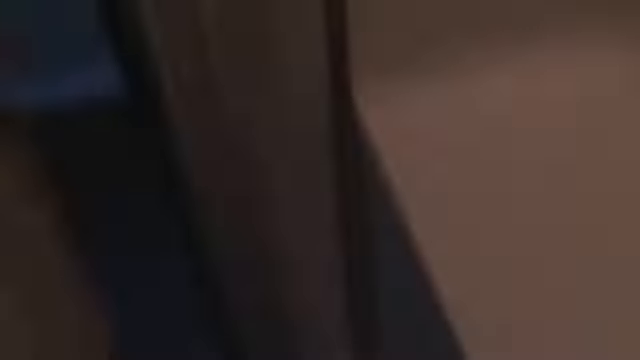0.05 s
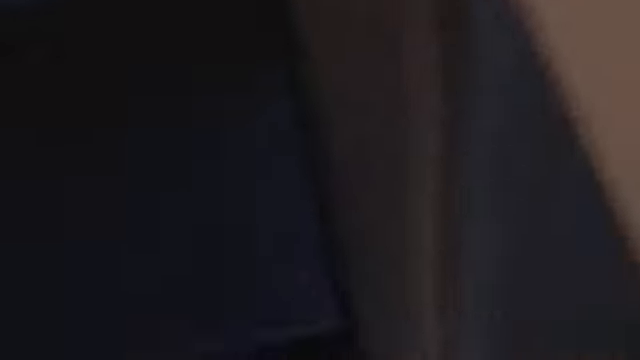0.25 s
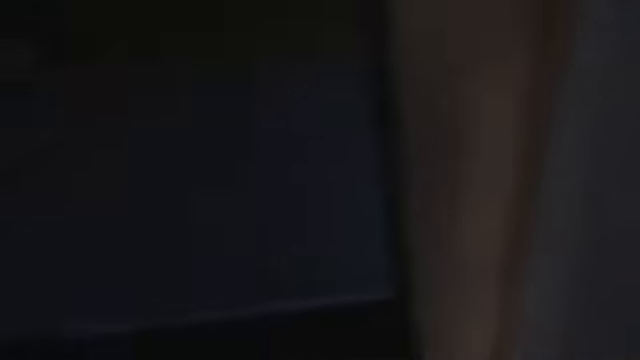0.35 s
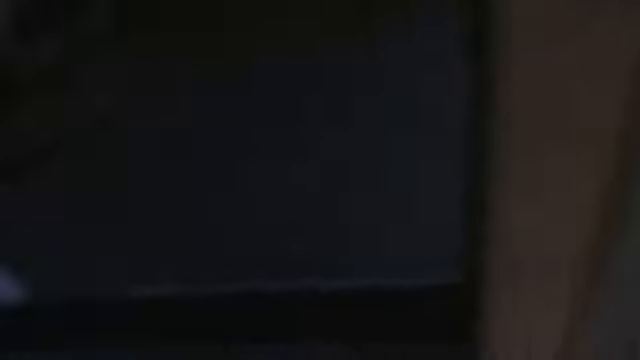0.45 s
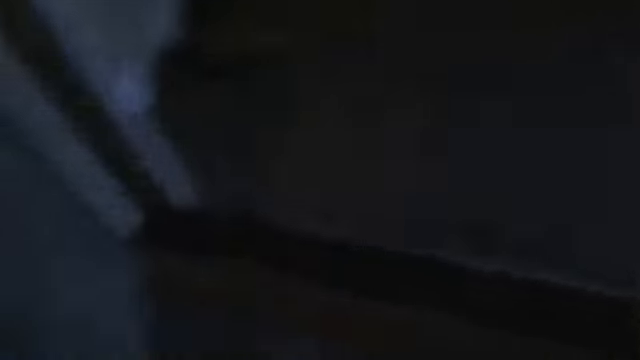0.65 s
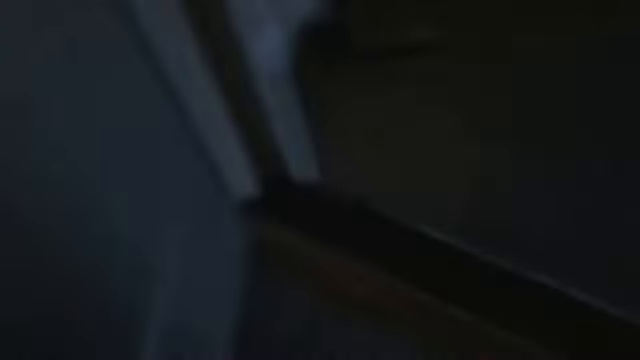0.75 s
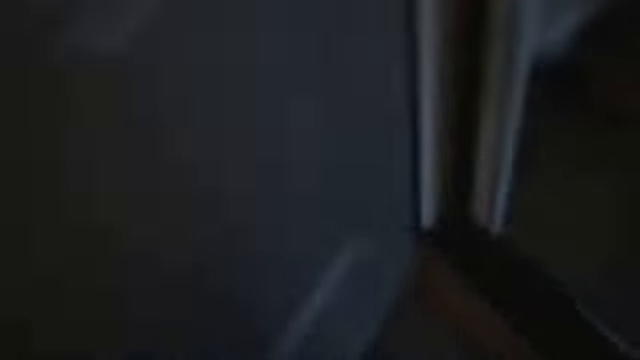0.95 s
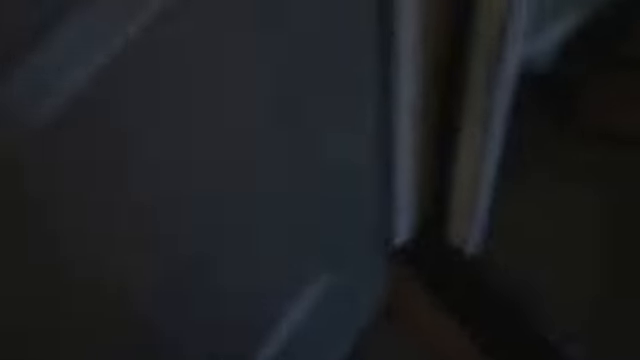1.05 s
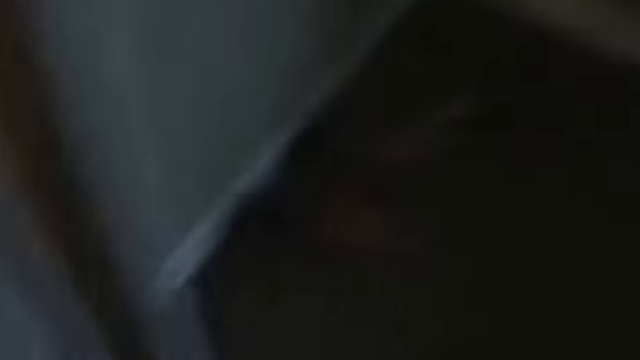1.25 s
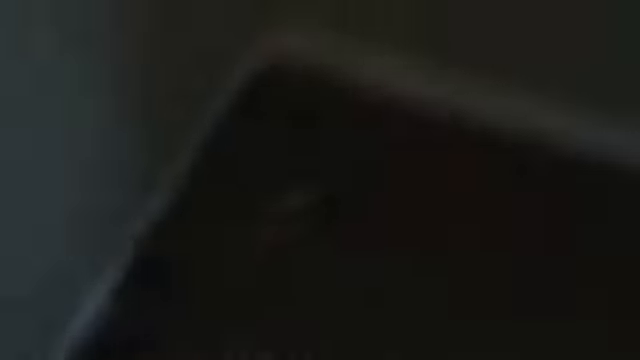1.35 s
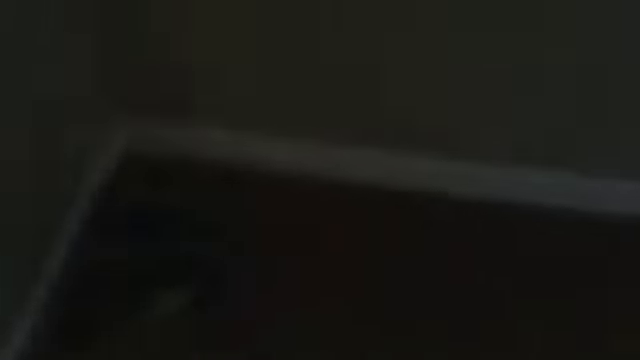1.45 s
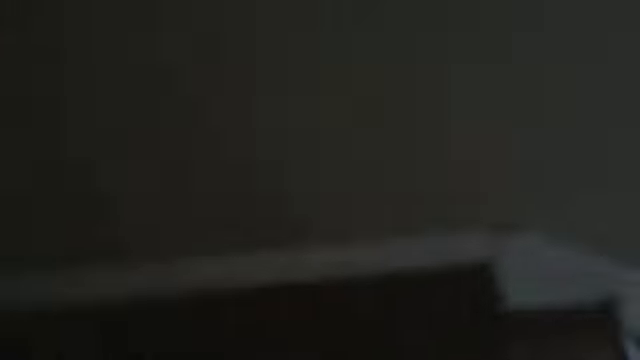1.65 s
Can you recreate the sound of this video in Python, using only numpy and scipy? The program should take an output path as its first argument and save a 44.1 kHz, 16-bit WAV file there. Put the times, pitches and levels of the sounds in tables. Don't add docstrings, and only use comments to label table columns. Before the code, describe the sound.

House door unlatches with a hard crack, then its hinge gives brief thin squeaks as it swings

```python
import sys
import numpy as np
from scipy import signal
from scipy.fft import rfft, irfft
from scipy.io import wavfile
from scipy.ndimage import uniform_filter1d

SR = 44100
rng = np.random.default_rng(int(sys.argv[2]) if len(sys.argv) > 2 else 0)


def invert_db(level):
    return 10 ** (np.asarray(level, dtype=float) / 20)


def dump_mix(stems):
    frames = np.atleast_2d(stems).T
    limited = np.clip(frames, -1, 1)
    pcm = np.round(limited * 32767).astype(np.int16)
    wavfile.write(sys.argv[1], SR, pcm)


N = 74970
T = np.arange(N) / SR

# f/Hz, density/dB
HOUSE_SPECTRUM = [(30, 4.5), (80, -4.5), (250, -8), (500, -16), (1200, -17), (2400, -14), (5000, -24),
                  (15500, -51)]
# t/s, rms level/dB, rise/s, fall t60/s, centre f/Hz
SCUFFS = [(0, -53.5, 0.0043, 0.29, 1220), (.115, -60, 0.028, .3, 1500), (.26, -48, 0.05, 0.13, 9700),
          (0.348, -46.5, 0.032, 0.12, 310), (0.923, -53, 0.005, 0.14, 1420), (0.76, -68, 0.019, 0.12, 2100),
          (1.463, -45, 0.0071, 0.16, 1660), (1.488, -43.5, 0.0037, 0.13, 3060), (1.7, -47, .008, .15, 4200),
          (1.469, -44, 0.0022, .04, 1250), (0.43, -56.5, 0.036, 0.16, 610), (1.66, -60, .03, 0.28, 280),
          (1.485, -45, 0.025, 0.15, 700), (0.2203, -30.5, 0.0019, 0.023, 2950),
          (.231, -30.5, 0.00065, 0.094, 3600), (1.28, -51.5, 0.0094, 0.061, 11500),
          (1.437, -51, 0.0044, 0.072, 13000), (1.7, -48.5, 0.0024, 0.044, 6900),
          (1.5, -49, 0.015, 0.3, 300)]
# t/s, peak level/dB, f/Hz, length/s
GRIP_BUMPS = [(0.018, -42.5, 63.5, 0.017), (0.147, -41, 102, 0.0031), (0.197, -36, 94, 0.0056),
              (0.23, -36, 65, 0.0099), (0.305, -23, 158.6, 0.006), (0.319, -28, 71, 0.012),
              (0.383, -40, 109, 0.015), (0.434, -36, 192, 0.0093), (.435, -36, 98, 0.018),
              (0.462, -30.5, 58.7, 0.017), (0.499, -37, 95, 0.0093), (0.633, -33, 148, 0.0028),
              (0.641, -31.5, 65.4, 0.014), (.695, -34.5, 81, 0.007), (.77, -49.5, 189, 0.0096),
              (.816, -33, 172.3, 0.0076), (.818, -30, 86, 0.013), (0.844, -44, 268, 0.0018),
              (0.914, -42, 60.6, 0.051), (.955, -40.5, 153, 0.0079), (0.999, -37.5, 72.4, 0.012),
              (1.052, -37, 72, 0.023), (1.078, -44, 144, 0.0091), (1.14, -26, 93, 0.0031),
              (1.18, -38, 208, 0.0048), (1.206, -32.5, 65.5, 0.014), (1.337, -29.5, 58.4, 0.0084)]
# t/s, grip rumble level/dB, cloth rustle level/dB
MOTION = [(0, 5, 2), (.07, -19, -8), (.12, -44, -2), (.15, -6, 3.5), (.3, 11.5, 19.5), (.5, 6, 1.5),
          (.56, 2, 2), (.7, 1.5, 5), (.85, -1, 1.5), (.95, -4, 4.5), (1.1, 3, 0.5), (1.2, 3.5, 3),
          (1.28, -8, 5), (1.4, -13, 6.5), (1.5, -3, 10.5), (1.6, -8.5, 3.5), (1.7, -16, 2)]
# f/Hz, density/dB
RUSTLE_SPECTRUM = [(300, -10), (1000, 7), (3000, 6), (6000, 4), (10000, -3.5), (12500, -2), (15500, -9.5)]
# t/s, peak level/dB, length/s
TICKS = [(.158, -48, 0.0042), (0.193, -58, 0.0014), (.2407, -7, .0005), (0.554, -51.5, .003),
         (1.412, -62, .002), (1.44, -49, .002), (1.513, -52, .001), (1.522, -43, .002), (1.524, -44, .002),
         (1.566, -56, .003), (1.5845, -43, .0008), (1.598, -54, .002), (1.6, -53, 0.0022),
         (1.663, -55, .002)]
# t/s, peak level/dB
LATCH_STRIKES = [
    (0.2208, -39),
    (.2225, -41),
    (0.2379, -21.5),
    (0.2409, -14),
]
# f/Hz, level/dB, t60/s
LATCH_MODES = [(4207, 2, 0.023), (3284, -5.5, .03), (3580, -5.5, .025), (2500, -8, 0.022),
               (7230, -4, 0.013), (12100, -5, 0.013)]
# t/s, peak level/dB, rattle length/s, bottom f/Hz, top f/Hz
BLOWS = [(0.237, -9, 0.0034, 1500, 13600), (.2407, -9.5, 0.00072, 1170, 15000),
         (0.2415, -13.5, 0.0092, 490, 8100), (0.2484, -21.5, 0.0031, 497, 9000),
         (0.2531, -31, 0.002, 400, 10000), (.2575, -17.5, 0.012, 400, 3000),
         (0.268, -25, 0.006, 600, 15000), (0.277, -17.5, 0.0035, 694, 6040),
         (0.2812, -20.5, .008, 685, 5930), (0.2903, -20, 0.003, 875, 7400),
         (0.296, -20.5, 0.0051, 248, 5000), (0.304, -21.5, 0.0098, 247, 2180),
         (0.318, -30, 0.0081, 497, 2500), (0.637, -33, 0.0024, 1200, 7500), (0.642, -30, 0.015, 900, 6100),
         (0.665, -32, 0.0063, 1120, 2220)]
# f/Hz, level/dB, t60/s
PANEL_MODES = [(649, -6, 0.049), (946, -5.5, 0.03), (1351, -1.5, 0.021), (1500, -4.5, 0.023),
               (1854, -1, 0.013), (2395, 1, 0.0079), (3060, -2.5, 0.013), (3540, 0.5, 0.006),
               (4540, -1.5, 0.01), (5200, 4, 0.0032), (290, -5, 0.03), (430, -11, 0.023),
               (15000, 7, 0.0044)]
# t/s, slip rate f/Hz, level/dB, overtone strength/dB
SQUEAKS = [
    [(.559, 3270, -49, -22), (.566, 3056, -35.5, -18.5), (.58, 2996, -37, -10), (.598, 2916, -37.5, -1.5),
     (.612, 2902, -37, -10), (.628, 2829, -43, -1), (.64, 2800, -52, 3)],
    [(.64, 2810, -54, 3), (.654, 2803, -42, -4), (.668, 2802, -41, -10), (.684, 2804, -35, -9.5),
     (.715, 2806, -36, -8), (.735, 2797, -43, -5), (.755, 2792, -37, -9.5), (.768, 2783, -41, -8),
     (.778, 2810, -58, 1)],
    [(.778, 2802, -57, 4), (.808, 2782, -62, 5), (.826, 2784, -49, -13), (.845, 2778, -57, -5),
     (.866, 2796, -70, 0), (.91, 2790, -76, 2)],
    [(1.216, 1890, -58, 4), (1.227, 1940, -38, -7), (1.25, 1985, -38, -15), (1.258, 2010, -70, -6)],
    [(1.264, 2296, -52, -3), (1.273, 2130, -39.5, -4.5), (1.285, 2108, -33, -7), (1.294, 2117, -35.5, -16),
     (1.304, 2120, -50, -12)],
    [(1.29, 2120, -53, -3), (1.3, 2190, -34, -2), (1.312, 2275, -36.5, -9), (1.326, 2336, -44, -2),
     (1.339, 2420, -32.5, -14.5), (1.349, 2500, -41.5, -20), (1.357, 2500, -63, -16)],
    [(1.428, 3150, -62, -30), (1.436, 3190, -56, -34), (1.441, 3200, -41, -27), (1.448, 3200, -52, -30),
     (1.462, 3170, -62, -32)],
]
# third partial/dB, fourth partial/dB
OVERTONES_DB = [(-17.5, -31), (-15, -36), (-17, -42), (-17, -45), (-12, -15), (-10.5, -38), (-20, -22)]
# f/Hz, t60/s
HALL_DECAY = [(250, 0.58), (600, 0.23), (1200, 0.41), (2400, 0.32), (4800, 0.23), (9600, 0.16),
              (14000, 0.17)]

HOUSE_DB, HOUSE_SWAY_DB, HOUSE_FOLLOWS = -56, 1.0, 0.2
CLICKS_PER_S, UNEVEN_DB = 9000, 2.5
RUMBLE_DB, RUMBLE_HZ, GRIP_DB = -51, 88.6, 3.5
RUSTLE_DB, PATCHY_DB = -65, 1.3
CRACK_DB = 13
SLIP_WOBBLE, FLUTTER_DB, TREMBLE_DB = 0.0035, 2.2, 1.8
HALL_DB, SQUEAK_HALL_DB, FIRST_WALL_S = -7, -7.5, 0.0036
LOW_CUT_HZ, TOP_HZ = 30, 15700


def unit(x):
    return x / np.sqrt(np.mean(x ** 2))


def bandpass(x, order, edges_hz):
    return signal.sosfilt(signal.butter(order, edges_hz, "band", fs=SR, output="sos"), x)


def band(x, hz, octaves):
    edges_hz = np.clip([hz * 2 ** (-octaves / 2), hz * 2 ** (octaves / 2)], 10, 0.49 * SR)
    return bandpass(x, 2, edges_hz)


def curve(rows, column=1):
    rows = np.array(rows)
    return np.interp(T, rows[:, 0], rows[:, column])


def walk(rate_hz):
    hold = int(SR / rate_hz)
    steps = np.repeat(rng.standard_normal(N // hold + 1), hold)
    smooth = uniform_filter1d(uniform_filter1d(steps, hold), hold)
    return unit(smooth[:N])


def fade(start_s, length_s):
    return (T >= start_s) * np.exp(-np.maximum(T - start_s, 0) / length_s)


def coloured(spectrum):
    points = np.array(spectrum)
    hz = np.arange(N // 2 + 1) * SR / N + 1
    gain_db = np.interp(np.log(hz), np.log(points[:, 0]), points[:, 1])
    return unit(irfft(rfft(rng.standard_normal(N)) * invert_db(gain_db), N))


def clicks():
    chance, sign, size = rng.random((3, N))
    level_db = -UNEVEN_DB * np.log(size + 0.02)
    return unit((chance < CLICKS_PER_S / SR) * np.sign(sign - 0.5) * invert_db(level_db))


def rings(modes):
    t = T[:SR // 8]
    return sum((-1) ** k * invert_db(db - 60 * t / t60) * np.sin(2 * np.pi * hz * t)
               for k, (hz, db, t60) in enumerate(modes))


def house_noise():
    level_db = HOUSE_DB + HOUSE_SWAY_DB * walk(7.4) + HOUSE_FOLLOWS * curve(MOTION, column=2)
    return invert_db(level_db) * coloured(HOUSE_SPECTRUM)


def scuffs():
    out = np.zeros(N)
    for s, db, rise_s, t60, hz in SCUFFS:
        swell = np.clip((T - s) / rise_s, 0, 1)
        fall = invert_db(-60 * np.maximum(T - s - rise_s, 0) / t60)
        out += invert_db(db + 2.0 * walk(89.9)) * swell * fall * unit(band(clicks(), hz, 1.68))
    return out


def handling():
    bumps = np.zeros(N)
    for s, db, hz, length_s in GRIP_BUMPS:
        swing = np.cos(2 * np.pi * (hz * (T - s) + rng.random()))
        bumps += invert_db(db) * np.exp(-0.5 * ((T - s) / length_s) ** 2) * swing
    low = band(band(rng.standard_normal(N), RUMBLE_HZ, 1.18), RUMBLE_HZ, 4.8)
    rumble = invert_db(RUMBLE_DB + curve(MOTION) + GRIP_DB * walk(25.21)) * unit(low)
    rustle_db = RUSTLE_DB + curve(MOTION, column=2) + PATCHY_DB * walk(39.37)
    return bumps + rumble + invert_db(rustle_db) * coloured(RUSTLE_SPECTRUM)


def ticks():
    bursts = sum(invert_db(db) * fade(s, length_s) for s, db, length_s in TICKS)
    return band(bursts * rng.standard_normal(N), 7100, 2.0)


def latch():
    taps = np.zeros(N)
    for s, db in LATCH_STRIKES:
        taps[int(s * SR)] = invert_db(db)
    return signal.fftconvolve(taps, rings(LATCH_MODES))[:N]


def blows():
    push, grit = np.zeros(N), clicks()
    for s, db, length_s, low_hz, top_hz in BLOWS:
        rattle = fade(s, length_s) * grit
        push += invert_db(db) * bandpass(rattle, 3, [low_hz, min(top_hz, 0.45 * SR)])
    panel = signal.fftconvolve(push, rings(PANEL_MODES))[:N]
    crack = invert_db(CRACK_DB) * band(push, 4700, 6.5)
    return 0.051 * panel + 0.11 * crack


def hinge():
    out = np.zeros(N)
    for rows, upper_db in zip(SQUEAKS, OVERTONES_DB):
        slip_hz = curve(rows) * (1 + SLIP_WOBBLE * walk(300))
        phase = 2 * np.pi * np.cumsum(slip_hz) / SR
        upper = sum(invert_db(db + FLUTTER_DB * walk(120)) * np.sin(partial * phase)
                    for partial, db in enumerate((0,) + upper_db, start=2))
        tone = invert_db(TREMBLE_DB * walk(90)) * np.sin(phase) + invert_db(curve(rows, column=3)) * upper
        slipping = (T > rows[0][0]) * (T < rows[-1][0])
        out += np.sqrt(2) * invert_db(curve(rows, column=2)) * slipping * tone
    return out


def hall(x):
    t = T[:SR // 2]
    tail = sum(band(rng.standard_normal(len(t)), hz, 1.16) * invert_db(-60 * t / t60) for hz, t60 in HALL_DECAY)
    tail = tail * (t > FIRST_WALL_S)
    return signal.fftconvolve(x, tail / np.sqrt(np.sum(tail ** 2)))[:N]


def scene():
    hits = scuffs() + latch() + blows()
    squeak = hinge()
    wet = hall(invert_db(HALL_DB) * hits + invert_db(SQUEAK_HALL_DB) * squeak)
    mix = house_noise() + hits + handling() + ticks() + 0.82 * squeak + wet
    return mix[None]


def band_limit(x):
    return signal.sosfilt(signal.butter(12, 15940, fs=SR, output="sos"), x)


def record(dry):
    low_pass = signal.ellip(8, 0.2, 70, TOP_HZ, fs=SR, output="sos")
    high_pass = signal.butter(2, LOW_CUT_HZ, "high", fs=SR, output="sos")
    mix = signal.sosfiltfilt(high_pass, signal.sosfilt(low_pass, dry))
    return band_limit(mix)


dry = scene()
out = record(dry)
dump_mix(out)
```